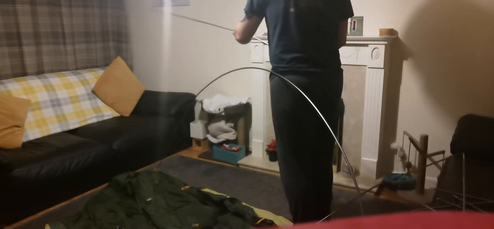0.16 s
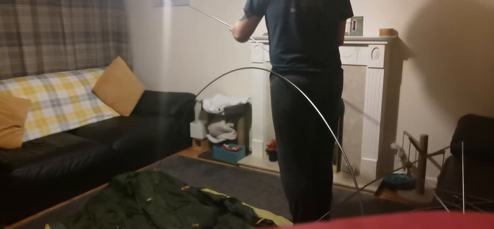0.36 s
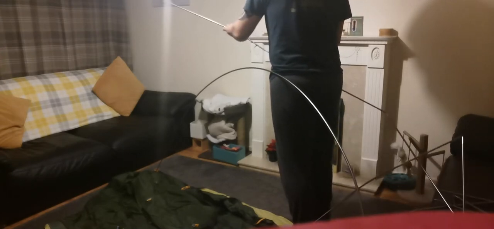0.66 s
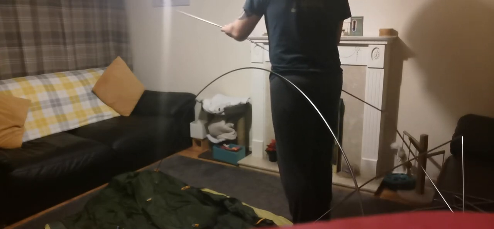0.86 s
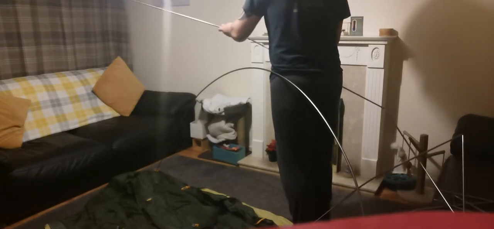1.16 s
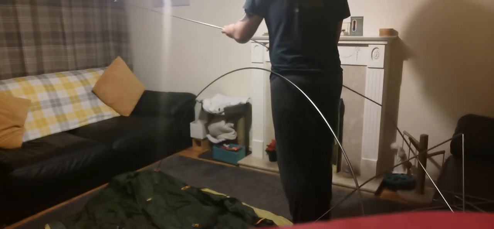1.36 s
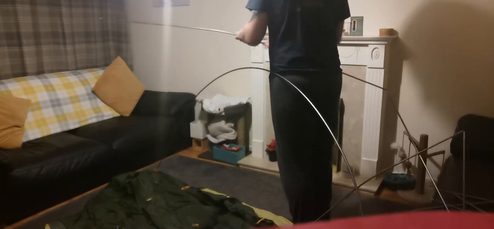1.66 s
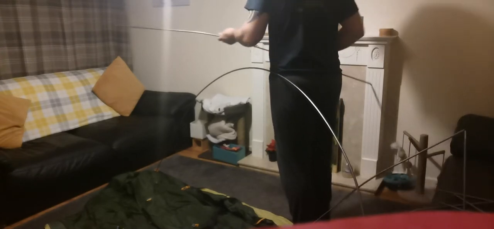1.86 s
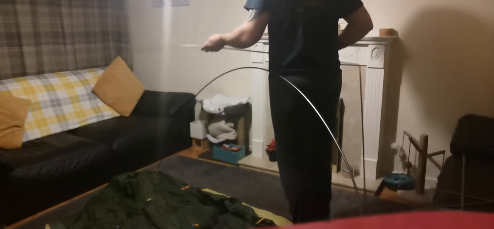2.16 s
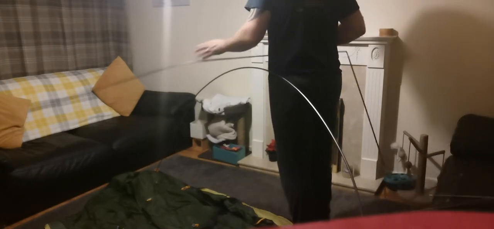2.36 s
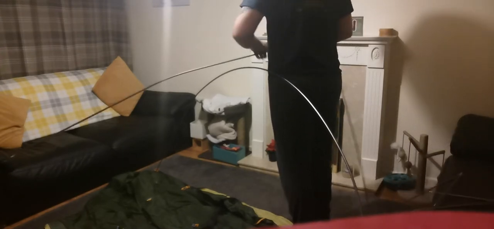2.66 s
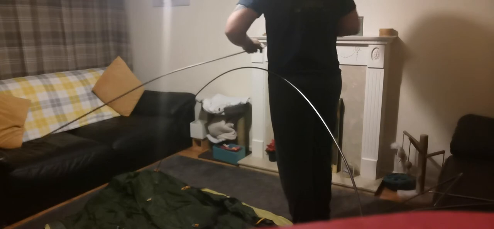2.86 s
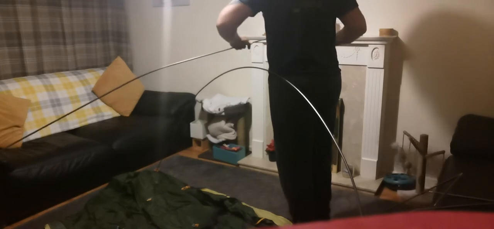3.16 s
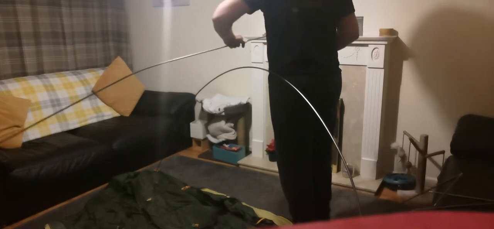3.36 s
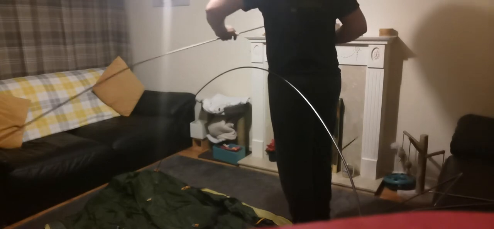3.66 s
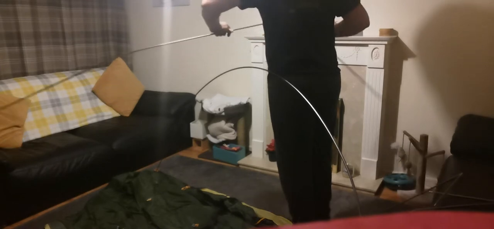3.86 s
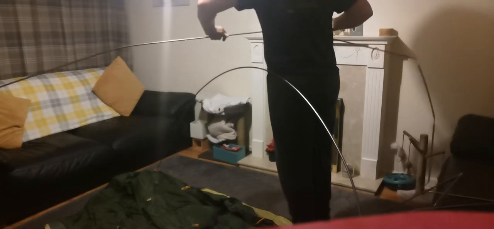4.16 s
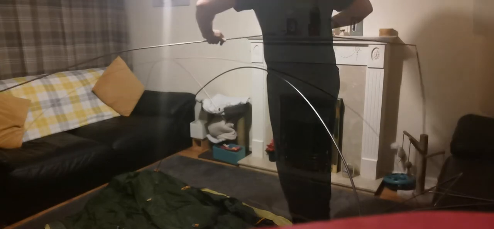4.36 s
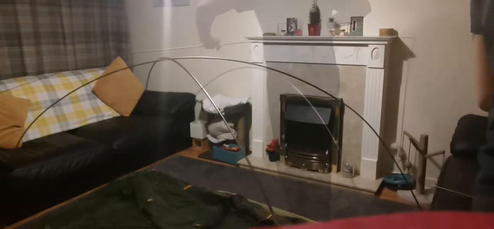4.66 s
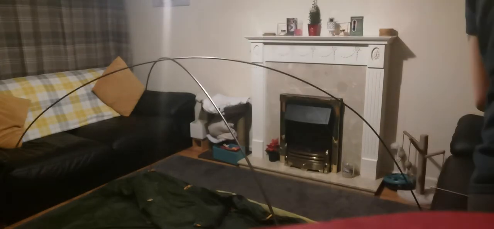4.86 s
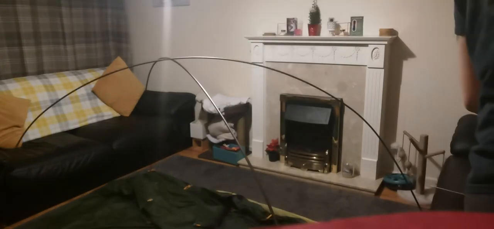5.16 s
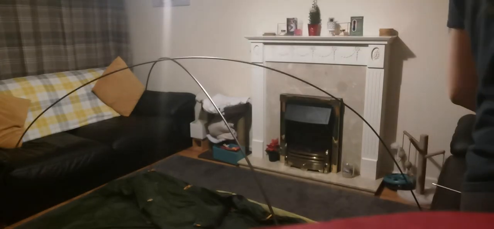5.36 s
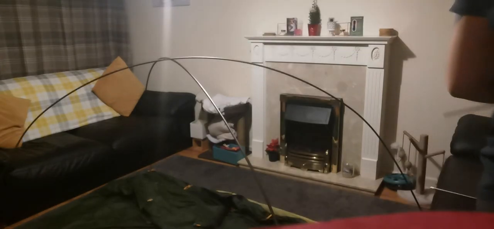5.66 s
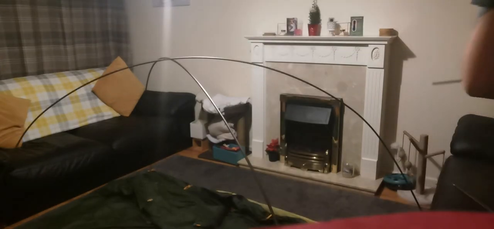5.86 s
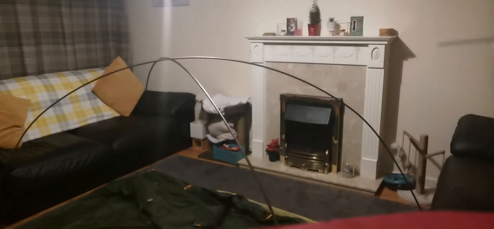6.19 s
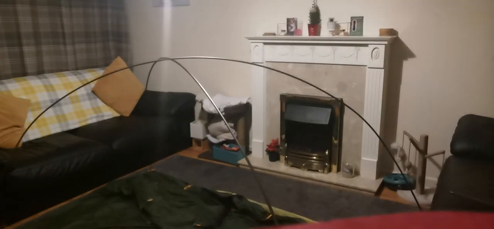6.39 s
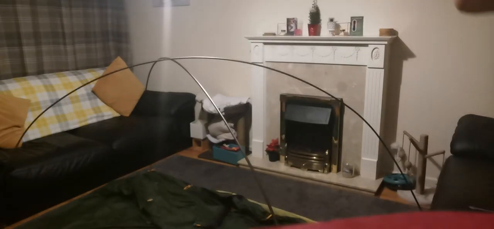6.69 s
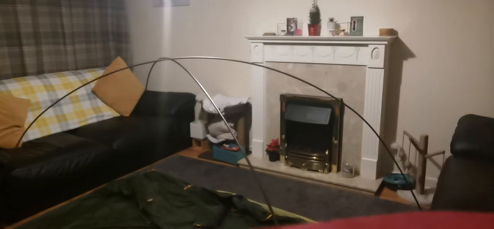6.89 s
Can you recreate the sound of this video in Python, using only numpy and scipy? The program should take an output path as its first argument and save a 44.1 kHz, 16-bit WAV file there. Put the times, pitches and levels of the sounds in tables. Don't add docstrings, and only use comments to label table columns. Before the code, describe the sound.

Close in a furnished living room, thin metal poles sweep with gritty rustling, then a joint snaps hard. Short scrapes lead to a dense rattle as a loose bundle slides and thumps down just after two seconds. Separate snaps, clacks and dry ticks follow, thinning out to one sharp snap at six seconds, a long faint brush and a low knock. Quiet room hush and soft floor rumble run beneath.

```python
import sys
import numpy as np
from scipy import signal
from scipy.fft import rfft, irfft, next_fast_len
from scipy.io import wavfile
from scipy.ndimage import uniform_filter1d

SR = 44100
rng = np.random.default_rng(int(sys.argv[2]) if len(sys.argv) > 2 else 0)


def output_pcm(signal):
    pcm = np.clip(np.atleast_2d(signal).T, -1, 1) * 32767
    wavfile.write(sys.argv[1], SR, np.round(pcm).astype(np.int16))


def natural_amplitude(level_db):
    exponent = np.asarray(level_db, float) / 20
    return 10 ** exponent


N = 310023
SIZE = 32768

# (frequency [Hz], t60 [s])
ROOM_DECAY = [(150, 0.12), (400, 0.45), (1000, 0.44), (2500, 0.35), (5000, 0.37), (8000, 0.24),
              (13000, 0.3)]
# (frequency [Hz], left minus right [dB])
PORT_BALANCE = [(60, 0.5), (110, 5.5), (200, 0.5), (380, 2), (700, -1), (1290, 3), (2380, -1), (4400, -2.5),
                (8120, -1), (15000, 5.5)]
# (frequency [Hz], width [Hz], depth [dB])
CASE_DIP = (9900, 670, -6.5)
# (frequency [Hz], level [dB per Hz])
HUSH_COLOUR = [(100, -1), (200, -22), (400, -15), (800, -13.5), (1600, -20), (3200, -22), (4700, -21.5),
               (6500, -25.5), (9000, -29.5), (16000, -39)]
# (time [s], level [dB])
BACKGROUND = [(0, 4), (.6, 3.5), (1.1, 0.5), (1.6, 7), (2.899, 4.5), (3.7, 6), (4.34, -2.5), (5.07, -2.5),
              (5.301, 2.1), (5.8, 0.5), (6.601, -4), (7.03, 7)]
# (time [s], length [s], deep level [dB], upper body level [dB])
STEPS = [(0.018, 0.057, -72, -75), (0.146, .04, -77, -84), (0.26, 0.076, -68, -68.5),
         (0.592, 0.18, -68, -78), (1.176, 0.15, -67.5, -91), (1.415, 0.048, -72, -64),
         (1.49, .04, -77, -76), (1.618, 0.033, -64, -80), (1.68, 0.034, -85, -70),
         (1.81, 0.074, -59.5, -69), (1.986, 0.065, -61, -67.5), (2.15, 0.035, -72, -69),
         (2.254, 0.1, -69, -51), (2.364, 0.03, -50, -48), (2.44, 0.043, -49.5, -75.5),
         (2.505, 0.037, -68, -63), (2.578, 0.12, -71, -56), (2.704, 0.16, -70, -70), (3.26, .04, -70, -95),
         (3.355, 0.046, -85, -64.5), (3.89, 0.062, -68, -91), (4.02, 0.061, -66, -67),
         (4.09, 0.04, -64, -73), (4.265, 0.087, -70, -81), (5.328, 0.043, -68, -65.5),
         (6.064, 0.025, -87, -69), (6.96, 0.037, -58.5, -54.5), (7.015, 0.025, -59, -86)]
# (frequency [Hz], level [dB], t60 [s])
TUBE_MODES = [(2800, -2, .02), (3600, -3, .02), (4110, -2, .05), (4550, 0, .025), (5150, 0, .02),
              (6650, 1, .025), (6950, 1, .025), (7500, -1, .025), (8800, -3, .02), (10700, 0, .02),
              (12600, -2, .02), (13500, -4, .02)]
# (frequency [Hz], level [dB per Hz])
POLE_COLOUR = [(88, -53), (150, -22.5), (201, -1), (270, -16), (398, -1), (745, -2), (837, 0), (2100, -4),
               (4000, -1), (7040, -1), (9820, -4), (12400, -9), (16000, -21)]
# (frequency [Hz], level [dB per Hz])
CLOTH_COLOUR = [(88, -34.5), (150, -20.5), (334, -15), (376, -13.5), (702, -9), (941, -7.5), (1100, -8.5),
                (1420, -4), (1830, -6.5), (2760, -1.5), (4490, 0), (12400, -18), (16000, -28)]
# (start [s], rise [s], fall [s], level [dB], brightness [dB])
SWEEPS = [
    (0, 0.0019, 0.086, -68, -24),
    (0.123, 0.046, .13, -49, -8),
    (.17, 0.11, 0.117, -46, -8),
    (.25, 0.14, 0.18, -46, -15),
]
RUBS = [
    (1.0, 0.056, 0.056, -63.5, -20),
    (1.149, 0.09, 0.05, -60.5, -17),
    (3.72, 0.12, 0.23, -70, -25),
    (5.03, 0.029, 0.28, -70.5, -11.5),
    (5.25, 0.035, 0.1, -59, -16.5),
    (5.45, 0.12, 0.11, -78.5, 5.5),
]
SCRAPES = [(1.315, 0.052, .04, -50.5, -15), (1.598, 0.057, .08, -51, -24.5),
           (1.78, 0.073, 0.24, -58.5, -27), (1.935, 0.038, 0.084, -53.5, -14.5),
           (1.98, 0.057, 0.12, -50, -8), (3.267, .016, 0.042, -52, -6), (3.83, 0.17, 0.075, -62.5, -11.5),
           (4.022, 0.026, 0.054, -47.5, -6.5), (4.08, 0.058, 0.036, -48.5, -6),
           (4.224, .04, 0.0053, -59, -8.5), (4.68, .04, 0.0037, -58.5, -4.5)]
SLITHERS = [
    (2.21, 0.033, .1, -41.5, -2.5),
    (2.269, 0.11, .006, -42, -7),
    (2.42, 0.019, 0.11, -46.5, -4.5),
    (2.519, 0.0072, 0.042, -46, 1),
    (2.57, .01, 0.0044, -38, -3),
    (2.82, .003, 0.037, -67, -32),
]
WHISPERS = [
    (6.55, 0.37, .8, -76, -20),
]
# (dull cloth share [dB], favoured [Hz], width [Hz], peak [dB], left minus right [dB])
SURFACES = [
    (-14.5, 7200, 940, -1.5, 4.5),
    (-4, 2300, 2000, 7.5, 5.5),
    (-10.5, 13000, 1500, 1.5, 2.5),
    (-9.5, 8100, 2400, 1.5, 4.5),
    (-12.5, 4700, 800, 17, -1),
]
# (time [s], peak [dB], knock on floor or wall [dB], brightness [dB], left minus right [dB])
SNAPS = [
    (0.1626, -34, -20, -16, 12),
    (1.3443, -41, -41, -38, -9.5),
    (1.3882, -21, -25, -15, 7),
    (1.938, -35.5, -19, -52, -10),
    (3.053, -41.5, -15.5, -16, -1),
    (3.9753, -25, -15.5, -15.5, -2),
    (6.0064, -22.5, -33.5, -15.5, -1),
]
# (time [s], peak [dB], knock [dB], brightness [dB], left minus right [dB])
TICKS = [
    (1.772, -36, -17, -33, -5.5),
    (4.269, -28.5, -29.5, -14.5, 4),
    (4.462, -45.5, -28, -5, -1),
    (4.726, -19, -37, -11, 3.5),
]
# (time [s], peak [dB], knock [dB], brightness [dB], left minus right [dB])
CLACKS = [
    (3.302, -18.5, -21.5, -13, 2),
    (3.8003, -55, -7.5, -8, -2),
    (4.5473, -61.5, -10, -26.5, -19),
    (5.2744, -51, -10, -33, 0.5),
    (5.3296, -45, -7, -12, -6.5),
    (6.95, -54.5, 3.5, -24, 2.5),
]
# (time [s], peak [dB], knock [dB], brightness [dB], left minus right [dB])
RATTLE = [(2.1259, -21.5, -14.5, -8.5, -5.5), (2.2023, -23.5, -11, -13, -8.5),
          (2.2252, -21, -29.5, -17.5, -2), (2.2956, -24, -13, -4.5, 2.5), (2.3382, -16.5, -14, -5, -2),
          (2.35, -20, -18, -11, -2.5), (2.4638, -27.5, -12.5, -7, -5), (2.529, -26, -9.5, -12, -12),
          (2.586, -22.5, -27.5, -18.5, -14.5), (2.609, -17.5, -17, -12.5, -4.5),
          (2.8684, -58.5, -5.5, -10, 6.5)]
# (chatter [ms], room share [dB], low-middle ring [dB], band of a bright click [Hz])
CONTACTS = [
    (7.3, 6, -25, 6750),
    (6.1, 0, -26, 5360),
    (5.5, 3.5, -12.5, 6460),
    (8.9, 5.5, -28, 5200),
]
# (time [s], peak [dB], frequency [Hz], t60 [s])
KNOCKS = [(0.37, -54.5, 388, 0.25), (1.388, -56, 190, 0.14), (2.126, -39.5, 210, 0.052),
          (2.339, -43, 418, 0.047), (2.5, -48, 154, 0.14), (2.609, -43.5, 209, 0.27),
          (3.051, -73, 203, 0.24), (3.303, -43, 458, 0.11), (3.976, -44.5, 178, 0.24),
          (5.308, -64, 374, 0.11), (6.006, -40, 247.4, 0.041), (6.905, -40.5, 230, 0.032)]
# (time [s], peak [dB], frequency [Hz], t60 [s])
PIPES = [
    (0.299, -54.5, 952, 0.13),
    (0.359, -49.5, 950, 0.085),
    (0.419, -65, 940, 0.096),
    (2.126, -36, 813, 0.039),
    (2.338, -36.5, 650, 0.051),
    (2.531, -66, 600, 0.077),
    (3.054, -60, 930, 0.055),
    (3.304, -58, 970, 0.044),
    (3.973, -37.5, 944, 0.024),
    (6.005, -55, 790, 0.16),
]


def on_log(table, hz):
    f, v = np.transpose(table)
    return np.interp(np.log(np.maximum(hz, 1)), np.log(np.maximum(f, 1)), v)


def unit(x):
    return x / np.sqrt(np.mean(np.abs(x) ** 2))


def shape(x, gain_at):
    size = next_fast_len(x.shape[-1])
    hz = np.arange(size // 2 + 1) * SR / size
    return irfft(rfft(x, size) * gain_at(hz), size)[..., :x.shape[-1]]


def lows(hz, edge_hz):
    return 1 / (1 + (hz / edge_hz) ** 4)


def bump(hz, peak_hz, width_hz, peak_db):
    return peak_db / (1 + (2 * (hz - peak_hz) / width_hz) ** 2)


def wide_noise(size):
    alike_hz = 394
    mid, side = rng.standard_normal((2, size))
    mid = shape(mid, lambda hz: np.sqrt(1 + lows(hz, alike_hz)))
    side = shape(side, lambda hz: np.sqrt(1 - .82 * lows(hz, alike_hz)))
    return np.array([mid + side, mid - side]) / np.sqrt(2)


def walk(rate_hz):
    hold = int(SR / rate_hz)
    steps = np.repeat(rng.standard_normal(N // hold + 1), hold)
    return 1.3 * uniform_filter1d(uniform_filter1d(steps, hold), hold)[:N]


def background():
    return np.interp(np.arange(N) / SR, *np.transpose(BACKGROUND))


def echoes(count, build_s=0.0088, early_db=6, early_s=.009):
    t = np.arange(SIZE // 2) / SR
    noise = wide_noise(count * len(t))
    out = 0
    for centre_hz in 2 ** np.arange(6.5, 14.5):
        octave = lambda hz: np.cos(np.pi / 2 * np.clip(np.log2((hz + 1) / centre_hz), -1, 1)) ** 2
        band = shape(noise, octave).reshape(2, count, -1)
        out = out + band * natural_amplitude(-60 * t / on_log(ROOM_DECAY, centre_hz))
    out = out * (1 - np.exp(-t / build_s)) * (1 + natural_amplitude(early_db) * np.exp(-t / early_s))
    return rfft(out / np.sqrt(np.mean(np.sum(out ** 2, -1))), SIZE)


def direct(pan_db, hz):
    lag = 8.3
    side = np.array([[1], [-1]])
    delay = lag * (side * np.tanh(pan_db / 3) - 1)
    return natural_amplitude(side * pan_db / 2) * np.exp(1j * np.pi * hz / SR * delay)


def ringing(hz, strikes):
    mode_hz, db, t60 = (column[:, None] for column in np.transpose(TUBE_MODES))
    mode_hz = mode_hz * (1 + .025 * strikes[::-1, None])
    width = np.log(1000) / t60 / (2 * np.pi) * 1.5
    strength = natural_amplitude(db + 5 * np.clip(strikes[:, None], -3, 1.2))
    return np.sum(strength * width / (width + 1j * (hz - mode_hz)), 0)


def hush():
    air = shape(wide_noise(N), lambda hz: natural_amplitude(on_log(HUSH_COLOUR, hz)) * (1 - lows(hz, 200)))
    return air * natural_amplitude(-49.5 + background() + 1.5 * walk(14))


def shake():
    deep_rest_db, upper_rest_db = -72.5, -75
    thump_s, thump_db, thump_hz, thump_t60 = 2.338, -28, 62, .12
    t = np.arange(N) / SR
    coarse = t[::64]
    s, length, deep_db, upper_db = np.transpose(STEPS)
    lumps = np.exp(-((coarse - s[:, None]) / length[:, None]) ** 2)
    stir = 0.49 * background() + 0.89 * walk(12)
    deep_gain = natural_amplitude(deep_rest_db + stir) + np.interp(t, coarse, natural_amplitude(deep_db) @ lumps)
    upper_gain = natural_amplitude(upper_rest_db + stir) + np.interp(t, coarse, natural_amplitude(upper_db) @ lumps)
    deep = unit(shape(wide_noise(N), lambda hz: lows(hz, 75) * (1 - lows(hz, 33))))
    upper = unit(shape(wide_noise(N), lambda hz: lows(hz, 328) * (1 - lows(hz, 72))))
    age = np.maximum(t - thump_s, 0)
    thump = natural_amplitude(thump_db - 60 * age / thump_t60) * np.sin(2 * np.pi * thump_hz * age)
    return deep_gain * deep + upper_gain * upper + thump


def swell(rise_s, fall_s):
    rise, fall = (np.sin(np.linspace(0, np.pi / 2, int(max(s, .002) * SR))) for s in (rise_s, fall_s))
    return np.r_[rise ** 2.2, fall[::-1] ** 1.1]


def slides(rooms, grit=1.6, wet_db=3, ring_db=-3, scale_db=-5):
    out = np.zeros((2, N + 2 * SIZE))
    hz = np.arange(SIZE + 1) * SR / SIZE / 2
    chance = rng.standard_normal((2, N + SIZE))
    patchy = natural_amplitude(2.4 * walk(40))
    grains = unit(chance[0] * np.abs(chance[1]) ** grit) * np.resize(patchy, N + SIZE)
    tables = (SWEEPS, RUBS, SCRAPES, SLITHERS, WHISPERS)
    strokes = [row + kind for rows, kind in zip(tables, SURFACES) for row in rows]
    strikes = rng.standard_normal((len(strokes), len(TUBE_MODES)))
    for k, stroke in enumerate(strokes):
        s, rise_s, fall_s, db, bright_db, dull_db, peak_hz, width_hz, peak_db, pan_db = stroke
        start = int(max(s, 0) * SR)
        press = swell(rise_s, fall_s)
        surface = natural_amplitude(on_log(CLOTH_COLOUR, hz) + bump(hz, peak_hz, width_hz, peak_db))
        surface = surface * (1 + natural_amplitude(ring_db) * ringing(hz, strikes[k]))
        surface = surface / np.sqrt(np.mean(np.abs(surface) ** 2 * (hz > 2000) * (hz < 9000)))
        shares = lows(hz, 10000) - lows(hz, 2100)
        shares = shares + natural_amplitude(dull_db + 13) * lows(hz, 1300)
        shares = shares + natural_amplitude(bright_db + 15) * (1 - lows(hz, 6880))
        rub = rfft(grains[start:start + len(press)] * press * natural_amplitude(db + scale_db), 2 * SIZE) * shares
        room = rfft(irfft(rooms[:, k], SIZE), 2 * SIZE)
        heard = irfft(rub * surface * (direct(pan_db, hz) + natural_amplitude(wet_db) * room), 2 * SIZE)
        out[:, start:start + 2 * SIZE - 2048] += heard[:, :-2048]
    return out[:, :N]


def clicks(rooms, ring_db=-4, scale_db=-8, band_db=4):
    out = np.zeros((2, N + SIZE))
    hz = np.arange(SIZE // 2 + 1) * SR / SIZE
    t = np.arange(2048) / SR
    low, middle, high = lows(hz, 1150), lows(hz, 2500) - lows(hz, 1150), 1 - lows(hz, 9000)
    tables = (SNAPS, TICKS, CLACKS, RATTLE)
    hits = sorted(row + kind for rows, kind in zip(tables, CONTACTS) for row in rows)
    for k, (s, db, knock_db, bright_db, pan_db, ms, wet_db, middle_db, bright_hz) in enumerate(hits):
        band_hz = bright_hz if bright_db > -15 else 3740
        chance = rng.standard_normal((3, len(t)))
        age = np.maximum(t - .003, 0) / (ms / 4000)
        chatter = chance[0] * np.abs(chance[1]) ** .6 * age ** 2 * np.exp(-age)
        tilt = 1 + (natural_amplitude(knock_db + 16) - 1) * low
        tilt = tilt + (natural_amplitude(middle_db + 12.0) - 1) * middle
        tilt = tilt + (natural_amplitude(bright_db + 13.5) - 1) * high
        body = natural_amplitude(on_log(POLE_COLOUR, hz) + bump(hz, band_hz, 1200, band_db)) * tilt
        body = body * (1 + natural_amplitude(ring_db) * ringing(hz, chance[2, :len(TUBE_MODES)]))
        source = rfft(chatter / np.sqrt(np.sum(chatter ** 2)), SIZE)
        even = np.sqrt(uniform_filter1d(np.abs(source) ** 2, size=200))
        path = body * (direct(pan_db, hz) + natural_amplitude(wet_db) * rooms[:, k] / even)
        heard = natural_amplitude(db + 23 + scale_db) * irfft(source * path, SIZE)
        start = int((s - .0065) * SR)
        out[:, start:start + SIZE // 2] += heard[:, :SIZE // 2]
    return out[:, :N]


def knocks(rooms, wet_db=4, scale_db=-6):
    out = np.zeros((2, N + SIZE))
    t = np.arange(SIZE // 2) / SR
    for k, (s, db, hz, t60) in enumerate(list(KNOCKS) + list(PIPES)):
        mode = natural_amplitude(db + scale_db - 60 * t / max(t60, .01)) * np.sin(2 * np.pi * hz * t)
        heard = irfft(rfft(mode, SIZE) * (1 + natural_amplitude(wet_db) * rooms[:, k]), SIZE)
        start = int(s * SR)
        out[:, start:start + SIZE] += heard
    return out[:, :N]


def scene():
    rooms = echoes(count=len(SNAPS) + len(TICKS) + len(CLACKS) + len(RATTLE))
    return hush() + shake() + slides(rooms[:, ::-1]) + clicks(rooms) + knocks(rooms)


def band_limit(x):
    return signal.sosfilt(signal.butter(12, 16470, fs=SR, output="sos"), x)


def record(dry):
    def response(hz):
        balance = np.array([[.5], [-.5]]) * on_log(PORT_BALANCE, hz)
        colour = bump(hz, *CASE_DIP) + bump(hz, 15500, 2500, 3)
        return natural_amplitude(balance + colour) * (hz < 15870)

    return band_limit(shape(dry, response))


dry = scene()
out = record(dry)
output_pcm(out)
```